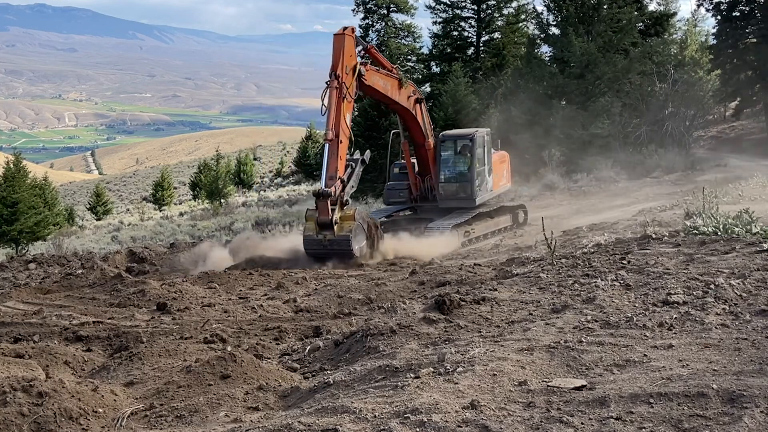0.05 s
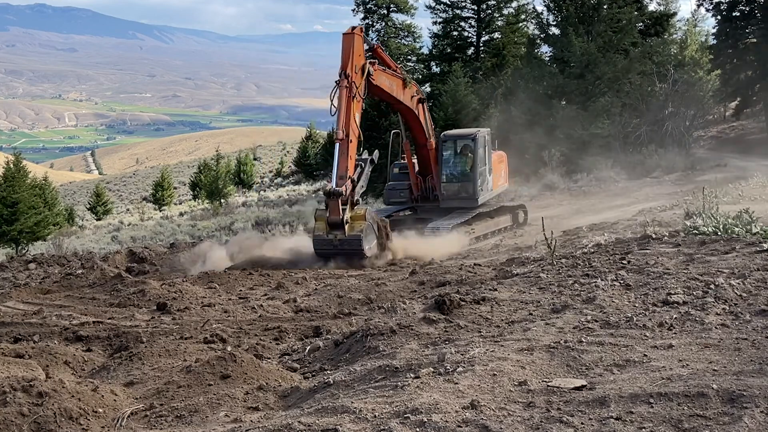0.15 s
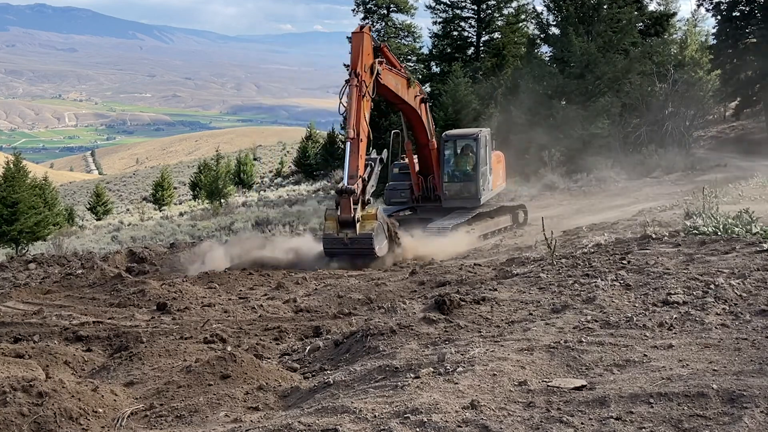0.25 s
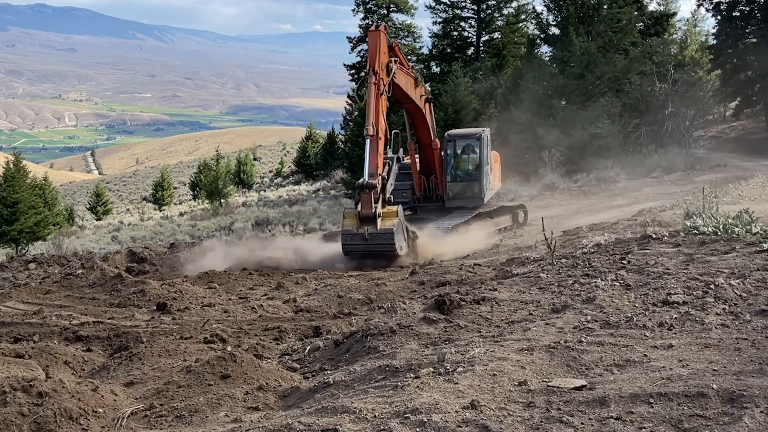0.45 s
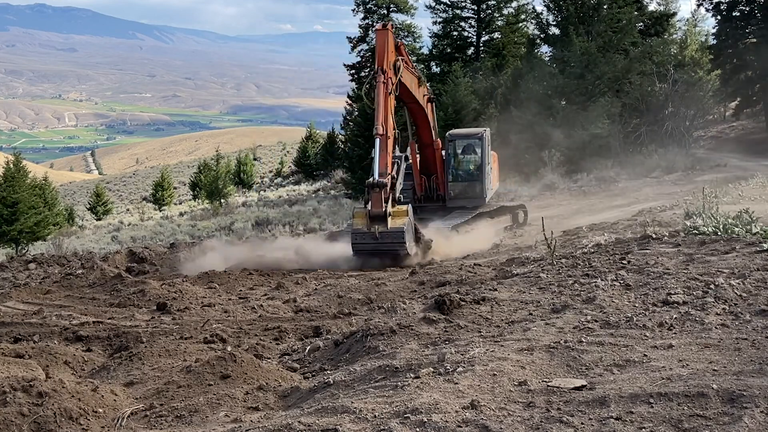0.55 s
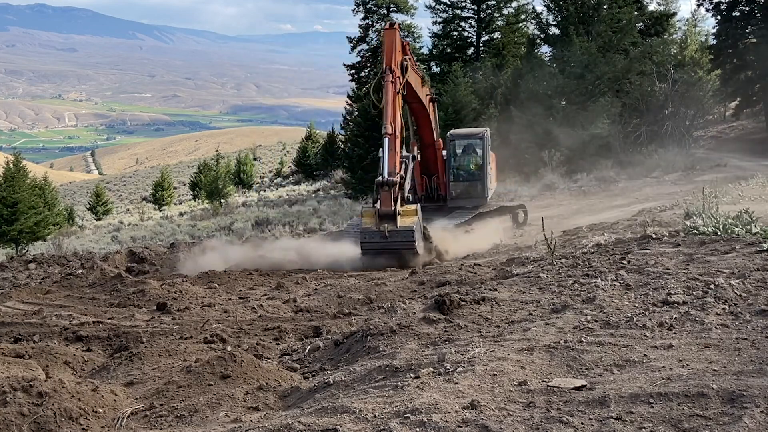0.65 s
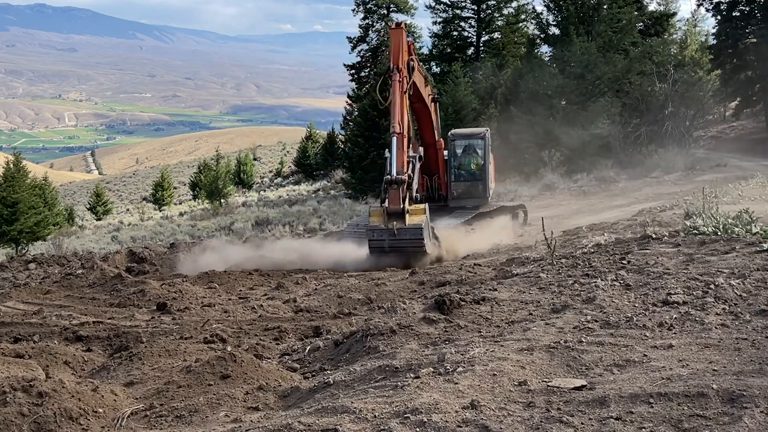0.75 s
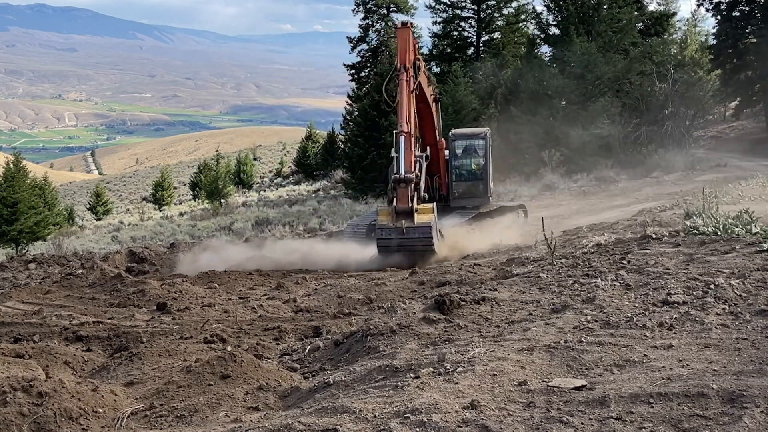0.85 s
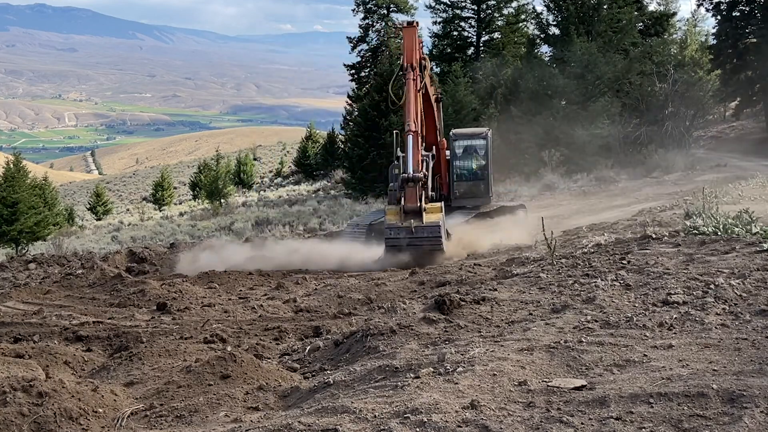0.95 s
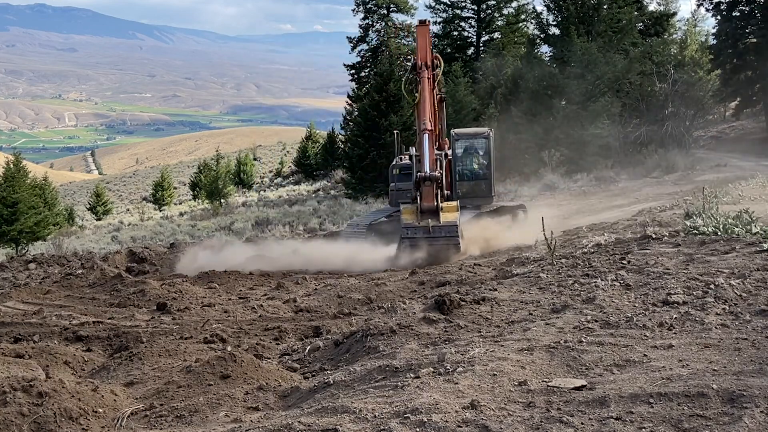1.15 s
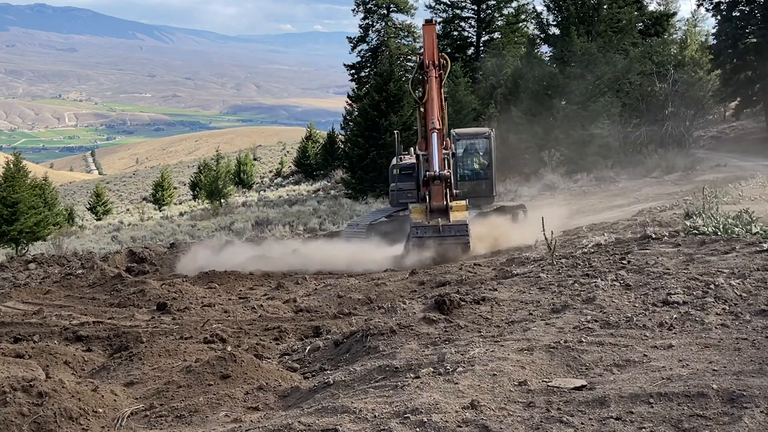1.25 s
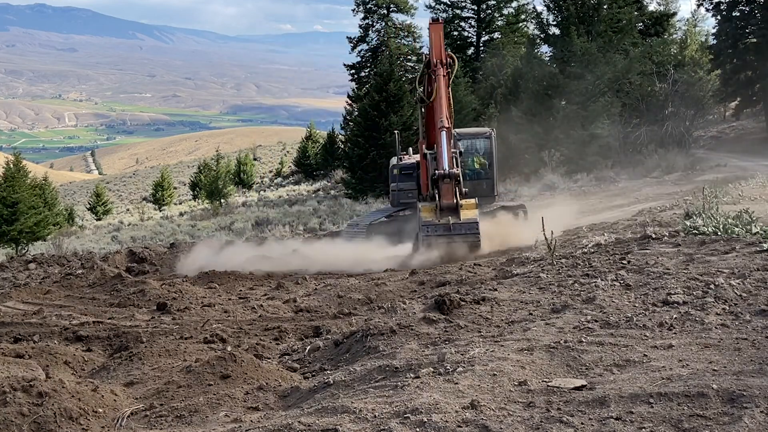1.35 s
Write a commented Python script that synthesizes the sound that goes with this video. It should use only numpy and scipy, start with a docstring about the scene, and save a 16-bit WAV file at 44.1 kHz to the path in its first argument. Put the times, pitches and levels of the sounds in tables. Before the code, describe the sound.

An excavator bucket scrapes and clanks over stony soil, its diesel engine droning underneath.

```python
"""An excavator's steel bucket sweeps sideways over stony soil on an open hillside.
Stones knock on it and grind along it in dense tiny slips, so the steel booms, clanks and rings.
Grit crunches, chips ping, shoved earth rumbles and loose soil trickles behind.
The diesel engine drones steadily underneath.
The slope returns a short, faint echo of the scraping that lingers in the treble."""
import sys
import numpy as np
from scipy import signal
from scipy.fft import rfft, irfft
from scipy.io import wavfile
from scipy.ndimage import uniform_filter1d

SR = 44100
rng = np.random.default_rng(int(sys.argv[2]) if len(sys.argv) > 2 else 0)


def generate_wav(sig):
    """Save sig (samples, or channels by samples) to the path in sys.argv[1] as 16-bit PCM at SR."""
    pcm = np.round(np.clip(np.atleast_2d(sig).T, -1, 1) * 32767).astype(np.int16)
    wavfile.write(sys.argv[1], SR, pcm)


N = 61739
TIME = np.arange(N) / SR


# scrape spectra: freq_hz, density_db
BOOM_SPECTRUM = [(40, -50), (70, -20), (115, -16.5), (155, 0), (190, -1), (225, 2), (265, -1), (300, -0.5),
                 (335, -7.5), (600, -38), (2000, -72)]
CLANK_SPECTRUM = [(40, -62), (200, -44), (380, -6), (520, -5), (760, -6), (1150, -5), (1500, -11.5),
                  (2100, -22), (4000, -32.5), (9000, -50)]
CRUNCH_SPECTRUM = [(60, -52), (500, -9.5), (1200, 5), (1800, 5), (2500, 1), (3100, 1), (3700, -2),
                   (4200, -9.5), (5100, -25.5), (7000, -33), (9000, -53), (15000, -64)]
FIZZ_SPECTRUM = [(100, -60), (3000, -13), (4500, 2.5), (5100, 1.5), (6200, 2), (7100, 1), (7800, -2.5),
                 (8700, -11.5), (10400, -9.5), (12000, -19), (14500, -16), (15700, -25)]
# bucket body and cutting edge: pitch_hz, level_db, t60_s
BODY_MODES = [(159.6, -16, 0.08), (263, -14, 0.067), (294.9, -10.5, 0.16), (502.7, -13, 0.28),
              (536.8, -10.5, 0.4), (610, -8.5, 0.2), (708, -10, 0.26), (730, -14.5, 0.69),
              (783, -12.5, 0.75), (841, -10.5, 0.3), (974, -11, 0.21), (1117, -11.5, 0.11),
              (1268, -12, 0.18), (1399, -18.5, 0.12), (1477, -15, 0.1), (1522, -18, 0.14),
              (1686, -22, 0.23)]
EDGE_MODES = [(1920, -18, 0.031), (3070, -16.5, 0.049), (3660, -20, 0.31), (4670, -44, 0.037),
              (6250, -37, 0.024)]

def bucket(chip_share=0.45, body_db=-2):
    """Slips boom in the shell, clank in the plates and crunch in the grit; the steel rings on."""
    boom, clank, crunch, fizz = stone_forces()
    shell = boom * scrape(BOOM_SPECTRUM, even_s=0.014)
    grit = crunch * scrape(CRUNCH_SPECTRUM, even_s=0.0065)
    grit += np.sqrt(1 - chip_share) * fizz * scrape(FIZZ_SPECTRUM, even_s=0.02)
    grit += np.sqrt(chip_share) * chips(fizz)
    plates = clank * scrape(CLANK_SPECTRUM, even_s=0.0097)
    contact = shell + plates + grit
    ringing = from_db(body_db) * rubbed_steel(clank, BODY_MODES) + rubbed_steel(crunch, EDGE_MODES)
    return contact + slope_echo(contact) + ringing


# stones on the bucket: start_s, rise_s, fall_tau_s, boom_db, clank_db, crunch_db, fizz_db
STONE_CONTACTS = [(0.061, 0.0063, 0.044, -48.5, -46.5, -55.5, -73),
                  (0.113, 0.0092, 0.015, -46, -44.5, -58.5, -81),
                  (0.217, 0.0032, 0.052, -53, -41, -43, -55), (0.239, 0.0065, 0.017, -44, -46, -39, -54.5),
                  (0.258, 0.0054, .011, -39, -39, -33.5, -50), (0.323, 0.0053, 0.043, -51, -47, -73, -75),
                  (0.369, 0.012, 0.014, -51, -47.5, -52, -75), (0.426, .005, 0.015, -57, -46, -49, -78),
                  (0.439, 0.017, 0.013, -45, -30, -26, -42.5),
                  (0.451, 0.0082, 0.014, -29.5, -44, -27.5, -41.5),
                  (0.462, 0.005, 0.013, -25.5, -25, -38, -58),
                  (.480, 0.008, 0.04, -35.5, -29, -38.5, -59.5),
                  (0.522, 0.0043, 0.0067, -30, -51, -44, -50.5), (0.571, 0.039, 0.14, -50, -36, -47.5, -71),
                  (0.644, 0.018, 0.033, -34.5, -37, -37, -50), (0.692, 0.0062, 0.015, -28, -34, -32, -48),
                  (0.706, 0.019, 0.014, -30.5, -33, -41, -69), (.755, 0.01, 0.014, -42, -61, -49, -66),
                  (0.8, 0.0048, 0.026, -35.5, -40.5, -38, -59.5),
                  (0.822, 0.018, 0.0099, -37, -35, -42, -58.5),
                  (0.841, .011, 0.017, -27.5, -31.5, -34, -53),
                  (0.864, 0.0059, 0.018, -34.5, -31.5, -39.5, -68),
                  (0.9, 0.007, 0.012, -41, -54, -55, -60.5), (0.956, 0.015, 0.086, -46, -71, -55.5, -78),
                  (1.075, 0.0083, 0.022, -49, -42.5, -41, -56), (1.116, 0.0025, 0.0088, -49, -47, -39, -71),
                  (1.122, 0.0032, .02, -40.5, -41, -51, -76), (1.149, 0.012, 0.068, -48, -51, -62, -87),
                  (1.325, 0.019, 0.03, -54, -59, -67, -91)]

def stone_forces():
    """Each stone loads the bucket and slips free: envelopes of boom, clank, crunch and fizz."""
    power = 0
    for start_s, rise_s, fall_tau_s, *levels_db in STONE_CONTACTS:
        load = np.clip((TIME - start_s) / rise_s, 0, 1) ** 0.73
        release = np.exp(-np.maximum(TIME - start_s - rise_s, 0) / fall_tau_s)
        power += np.outer(from_db(levels_db), load * release) ** 2
    return np.sqrt(power)


def scrape(spectrum, even_s):
    """A steady stream of tiny slips in one colour."""
    return evened(coloured(slips(per_s=9000, spread_db=2.5), spectrum), even_s)


def rubbed_steel(force, modes, linewidth_hz=3.96):
    """Each mode gathers energy from the rubbing and rings it away; the slips jostle its phase."""
    out = 0
    for pitch_hz, level_db, t60_s in modes:
        retained = np.exp(-2 * np.log(1000) / (t60_s * SR))
        energy = signal.lfilter([1 - retained], [1, -retained], force ** 2 + 1e-18)
        jostle = np.cumsum(rng.standard_normal(N)) * np.sqrt(2 * np.pi * linewidth_hz / SR)
        phase = 2 * np.pi * (pitch_hz * TIME + rng.random()) + uniform_filter1d(jostle, size=200)
        out += from_db(level_db) * np.sqrt(2 * energy) * np.sin(phase)
    return out


def chips(fizz, per_s=270, t60_s=0.035):
    """Stone chips ping off the steel, as strong as the fizz at their moment and pitch."""
    out = np.zeros(N)
    pitches_hz = np.linspace(4470, 11990, 200)
    sizes = rms_one(from_db(at_hz(FIZZ_SPECTRUM, pitches_hz)))
    sizes *= np.sqrt(4 * np.log(1000) / (t60_s * per_s))  # stream at unit rms
    for slot, (jitter, pick) in enumerate(rng.random((1000, 2))):
        start = int((slot + jitter) / per_s * SR)
        note = int(pick * len(pitches_hz))
        if start < N:
            t = TIME[:min(N - start, SR // 10)]
            ping = np.exp(-np.log(1000) * t / t60_s) * np.sin(2 * np.pi * pitches_hz[note] * t)
            out[start:start + len(t)] += sizes[note] * fizz[start] * ping
    return out


# stone on steel: start_s, hollow_db, side_plate_db, back_wall_db
KNOCK_HITS = [(.061, -40, -45, -70), (0.122, -52, -40, -52), (.218, -33, -41, -66), (.252, -60, -35.5, -58),
              (.272, -39, -46, -60), (.466, -35, -38, -27.5), (.488, -42, -44, -29.5),
              (.606, -45, -48, -40), (.866, -39, -43, -38), (.907, -42, -43, -36.5)]
# bucket parts: pitch_hz, level_db, t60_s
HOLLOW_MODES = [(505, -9, .06), (557.6, -2, 0.1), (688, -0.5, 0.08)]
SIDE_PLATE_MODES = [(734.7, -1.5, 0.54), (1207, -17, 0.39)]
BACK_WALL_MODES = [(706, -2, .18), (783, 0, .22), (841, -8, .18), (926, -8, .17)]

def knocks():
    """Depending on where it lands, a stone sounds the bucket's hollow, side plate or back wall."""
    starts_s, *levels_db = np.transpose(KNOCK_HITS)
    parts = (HOLLOW_MODES, SIDE_PLATE_MODES, BACK_WALL_MODES)
    return sum(struck_steel(list(zip(starts_s, db)), modes) for db, modes in zip(levels_db, parts))


# heavy stones: start_s, level_db
THUMP_HITS = [(.459, -19.5), (.694, -32), (.848, -30), (.893, -38)]
# bucket shell: pitch_hz, level_db, t60_s
SHELL_MODES = [(152, -7, .14), (212, -7, .07), (263, 0, .1), (298, -9, .08)]

def thumps():
    """Heavy stones set the whole shell ringing low."""
    return struck_steel(THUMP_HITS, SHELL_MODES)


# stones on the teeth: start_s, level_db
ZING_HITS = [(.655, -70), (.699, -59.5), (.847, -62), (.908, -70)]
# bucket teeth: pitch_hz, level_db, t60_s
TOOTH_MODES = [(7560, -4, 0.11), (9800, -0.5, 0.18)]

def zings():
    """Stones rub the teeth, which ring thinly."""
    return struck_steel(ZING_HITS, TOOTH_MODES)


def struck_steel(hits, modes):
    """Each mode rises in one cycle and decays, following whichever hit rings loudest."""
    out = 0
    for pitch_hz, mode_db, t60_s in modes:
        envelope = 0
        for start_s, hit_db in hits:
            attack = np.clip((TIME - start_s) * pitch_hz, 0, 1)
            decay = from_db(hit_db + mode_db - 60 * np.abs(TIME - start_s) / t60_s)
            envelope = np.maximum(envelope, attack * decay)
        out += envelope * np.sin(2 * np.pi * (pitch_hz * TIME + rng.random()))
    return out


# shoved earth: time_s, level_db
EARTH_LEVEL = [(.06, -55.5), (.2, -54), (.27, -44), (.33, -61), (.37, -38.5), (.42, -55), (.47, -32.5),
               (.51, -43.5), (.57, -38), (.64, -38), (.72, -40), (.78, -45), (.87, -40), (.95, -46.5),
               (1.1, -47.5), (1.4, -54)]
# its rumble: freq_hz, density_db
EARTH_SPECTRUM = [(15, -35), (30, -17), (48, -12), (68, 9.5), (86, 11.5), (104, 10), (140, -2.5),
                  (220, -22), (500, -63)]

def earth():
    """Clods tumble heavily ahead of the bucket."""
    rumble = coloured(slips(per_s=250, spread_db=2), EARTH_SPECTRUM)
    return from_db(over_time(EARTH_LEVEL)) * evened(rumble, span_s=0.093)


# trickling soil: time_s, level_db
SOIL_LEVEL = [(0, -65), (.2, -63.5), (.3, -45.5), (.43, -56.5), (.55, -53), (.9, -47), (1.05, -54),
              (1.2, -52.5), (1.4, -70)]
# its patter: freq_hz, density_db
SOIL_SPECTRUM = [(40, -22), (300, 7), (900, 10), (2000, -3), (3500, -4.5), (4700, -13.5), (6600, -20),
                 (9000, -39), (15000, -36)]

def soil():
    """Crumbs and gravel trickle behind the bucket."""
    return from_db(over_time(SOIL_LEVEL)) * coloured(slips(per_s=4000, spread_db=2.5), SOIL_SPECTRUM)


# drone: time_s, level_db
DRONE_LEVEL = [(0, -52), (.2, -50), (.3, -46.5), (.9, -45), (1.4, -43)]
# engine orders: firing_multiple, level_db
DRONE_ORDERS = list(zip(np.arange(2, 9) / 2, [0, -17.5, -14, -22, -16.5, -20, -25]))
# exhaust noise: freq_hz, density_db
EXHAUST_SPECTRUM = [(20, -48), (40, 1.5), (65, 1), (95, -2.5), (130, 0.5), (175, 4), (280, -8.5),
                    (380, -8.5), (600, -13.5), (1100, -19), (3000, -33), (5000, -49), (10000, -49.5),
                    (15000, -57)]

def engine(firing_hz=58.8, speed_wander=0.0026, waver_db=2, throb=0.19):
    """A diesel drones in low orders; its exhaust swells at each firing and rises with the drone."""
    level_db = over_time(DRONE_LEVEL)
    phase = 2 * np.pi * firing_hz * np.cumsum(1 + speed_wander * drift(rate_hz=8.07)) / SR
    drone = 0
    for multiple, order_db in DRONE_ORDERS:
        drone -= from_db(order_db + waver_db * drift(rate_hz=12.12)) * np.cos(multiple * phase)
    exhaust = evened(coloured(rng.standard_normal(N), EXHAUST_SPECTRUM), span_s=0.037)
    puffs = rms_one(np.exp(throb * np.cos(phase)) * exhaust)
    exhaust_db = -49.5 + 0.19 * (level_db - level_db.mean())
    return from_db(level_db) * np.sqrt(2) * drone + from_db(exhaust_db) * puffs


# echo of the slope: freq_hz, t60_s
ECHO_DECAY = [(100, 0.2), (300, 0.57), (750, 0.4), (3000, 0.64), (7000, 0.86), (14000, 0.31)]

def slope_echo(x, level_db=-13.5, build_s=0.01):
    """Ground and trees scatter an echo that dies octave by octave."""
    edges_hz = np.geomspace(40, 16000, 10)
    tail = 0
    for low, high in zip(edges_hz, edges_hz[1:]):
        bandpass = signal.butter(2, [low, high], "band", fs=SR, output="sos")
        decay = np.exp(-np.log(1000) * TIME / at_hz(ECHO_DECAY, np.sqrt(low * high)))
        tail += signal.sosfilt(bandpass, rng.standard_normal(N)) * decay
    tail *= 1 - np.exp(-TIME / build_s)
    return from_db(level_db) * signal.fftconvolve(x, tail / np.linalg.norm(tail))[:N]


def slips(per_s, spread_db):
    """Random clicks of uneven size; rms 1."""
    sizes = from_db(spread_db * np.minimum(rng.exponential(1, N), 4))
    signs = rng.choice([-1, 1], N)
    return rms_one(sizes * signs * (rng.random(N) < per_s / SR))


def coloured(x, spectrum):
    """Filter by a spectrum, silent above its last point; rms 1."""
    hz = np.arange(N + 1) * SR / (2 * N)
    gain = from_db(at_hz(spectrum, hz)) * (hz < spectrum[-1][0])
    return rms_one(irfft(rfft(x, 2 * N) * gain)[:N])


def evened(x, span_s):
    """Divide by the running rms."""
    return x / np.sqrt(np.abs(uniform_filter1d(x ** 2, int(span_s * SR))) + 1e-9)


def drift(rate_hz):
    """Slow random wander."""
    knots = rng.standard_normal(400)
    return np.interp(TIME * rate_hz, np.arange(len(knots)), knots)


def at_hz(table, hz):
    """Read a table on a log-frequency axis."""
    freqs_hz, values = np.transpose(table)
    return np.interp(np.log(np.maximum(hz, 1)), np.log(freqs_hz), values)


def over_time(table):
    return np.interp(TIME, *np.transpose(table))


def from_db(db):
    return 10 ** (np.asarray(db) / 20)


def rms_one(x):
    return x / np.sqrt(np.mean(x ** 2) + 1e-20)


def scene():
    """Bucket and stone strikes over earth, soil and engine; mono."""
    strikes = knocks() + thumps() + zings()
    return (bucket() + strikes + earth() + soil() + engine())[None]


def record(dry):
    """Steep low-pass on the top treble."""
    cutoff_hz = 15700
    return signal.sosfilt(signal.ellip(10, 0.1, 80, cutoff_hz, fs=SR, output="sos"), dry)


dry = scene()
out = record(dry)
generate_wav(out)
```